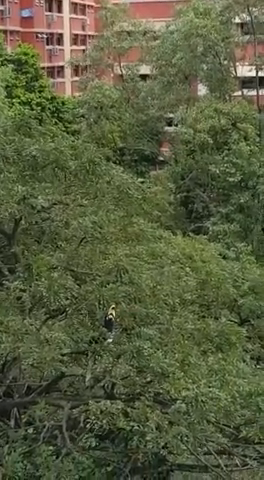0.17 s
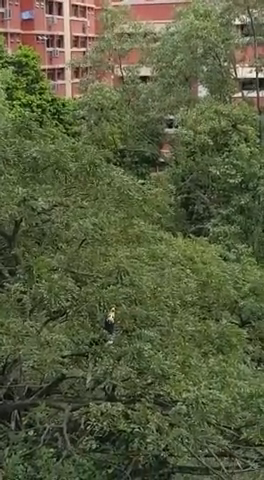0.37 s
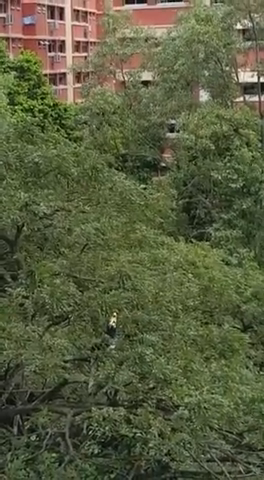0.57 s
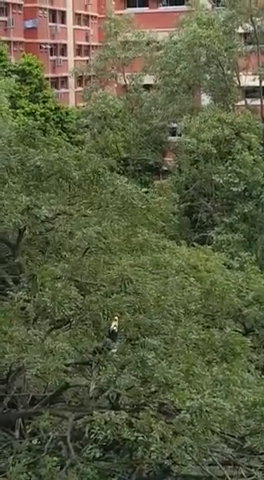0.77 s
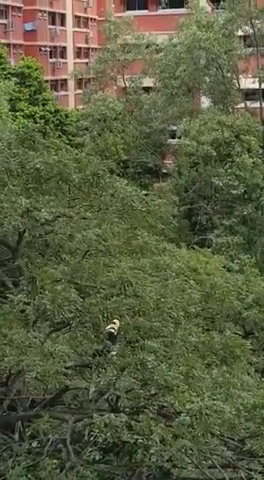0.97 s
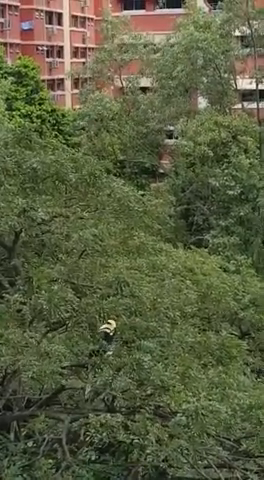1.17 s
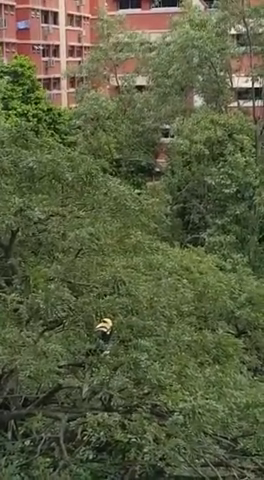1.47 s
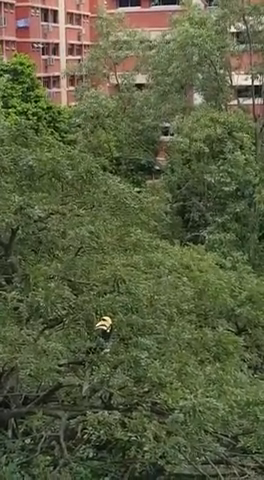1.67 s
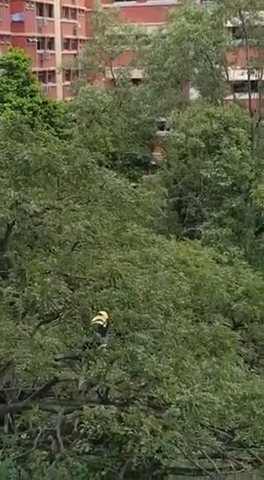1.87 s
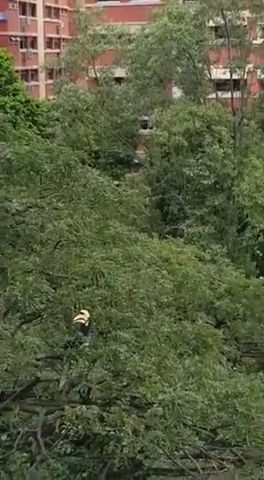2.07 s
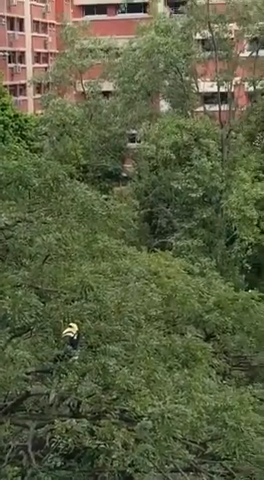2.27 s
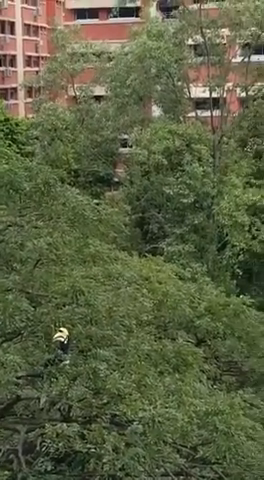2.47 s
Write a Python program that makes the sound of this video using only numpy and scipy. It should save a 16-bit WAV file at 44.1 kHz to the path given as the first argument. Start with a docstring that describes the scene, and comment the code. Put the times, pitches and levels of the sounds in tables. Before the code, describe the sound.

Three sharp raspy hornbill yelps ring off tall buildings after quiet traffic rumble and thin insects

```python
"""From the start, distant traffic roars and hums, two insects sing thinly, and an earlier echo dies away.
Tyres swell around 0.9 s; a soft hiss at 1.8 s and a faint whistle at 2.0 s follow, all shaped from noise
or wavering tones. From 2.1 s a hornbill in a treetop gives three short harsh yelps, each mixing rasping
noise with a tone that rises and then falls, with extra lines between its harmonics.
The yelps scatter in the leaves and ring on off tall house fronts."""
import sys
import numpy as np
from scipy import signal
from scipy.fft import rfft, irfft
from scipy.io import wavfile

SR = 44100
rng = np.random.default_rng(int(sys.argv[2]) if len(sys.argv) > 2 else 0)


def pcm_store(signal):
    """Save signal as 16-bit PCM."""
    levels = np.round(np.clip(np.atleast_2d(signal), -1, 1) * 32767)
    wavfile.write(sys.argv[1], SR, levels.astype(np.int16).T)


N = 115542  # length in samples, about 2.6 s


def undb(db):
    """Turn decibels into a gain."""
    return 10 ** (np.asarray(db) / 20)


def unit(x):
    """Scale to an average strength (rms) of 1."""
    return x / np.sqrt(np.mean(x ** 2))


def along(points):
    """Read a (frequency, value) table at every frequency bin, on a logarithmic frequency scale."""
    hz, value = np.array(points, float).T
    bins_hz = np.arange(N // 2 + 1) * SR / N
    return np.interp(np.log(bins_hz + 1), np.log(hz), value)


def colour(x, points):
    """Make each frequency stronger or weaker by a (frequency, level) table."""
    return irfft(rfft(x) * undb(along(points)), N)


def noise(channels=2):
    """White noise: every frequency equally strong on average."""
    return rng.standard_normal((channels, N))


def narrow(hz, width, channels=1):
    """Noise in one band, halved in amplitude half a width from its centre, rms 1."""
    bins_hz = np.arange(N // 2 + 1) * SR / N
    return unit(irfft(rfft(noise(channels)) / (1 + (2 * (bins_hz - hz) / width) ** 4), N))


def walk(rate):
    """A smooth random wander of spread 1, mostly slower than half the rate [Hz]."""
    return narrow(0, rate)[0]


def sine(hz):
    """A pure tone that follows a pitch curve, rms 1."""
    turns = np.cumsum(hz) / SR + rng.random()
    return np.sqrt(2) * np.sin(2 * np.pi * turns)


def gate(t, start, end, edge):
    """Open from start to end, with sloped edges centred on those times."""
    return np.clip(np.minimum(t - start, end - t) / edge + .5, 0, 1)


# Balance of the road roar: (frequency [Hz], relative level [dB])
ROAR_COLOUR = [(15, -48), (25, -37), (43, -15.5), (56, -2.5), (70, -10.5), (92, -1), (110, -4), (128, -9.5),
               (160, 0.5), (188, -9), (215, -4.5), (255, -11), (370, -13), (480, -16), (670, -13),
               (790, -15), (940, -12.5), (1200, -18), (1500, -21.5), (2000, -26), (2600, -30.5),
               (3000, -28), (3400, -37.5), (4600, -46), (7000, -51), (10500, -58.5), (12200, -49.5),
               (13500, -55), (15500, -53)]
# Strength of the left-right difference: (frequency [Hz], relative level [dB])
ROAR_WIDTH = [(60, -17), (150, -23.5), (290, -7.5), (640, -7), (1400, -1.5), (3000, -3), (7000, 0.5)]
# Lean of the roar to the left: (frequency [Hz], left minus right level [dB])
ROAR_LEAN = [(150, 0), (380, 4.5), (700, 2), (1300, 2), (2500, 1.5), (8000, 0.5)]


def road_roar():
    """Many far vehicles blend into noise, nearly the same in both ears in the deep bass; rms 1."""
    mid, side = colour(noise(), ROAR_COLOUR)
    side = colour(side, ROAR_WIDTH)
    half_lean = along(ROAR_LEAN) / 2
    left = irfft(rfft(mid + side) * undb(half_lean), N)
    right = irfft(rfft(mid - side) * undb(-half_lean), N)
    return unit(np.array([left, right]))


# Far engines: (start [s], end [s], pitch [Hz], pitch wander [Hz], level [dB])
HUMS = [(0.14, 0.598, 80, 2.8, -43), (0.15, 0.48, 99, 11.87, -39), (-.3, 2.9, 151, 3.015, -50),
        (1.124, 1.39, 150, 1.73, -45.5), (-.3, 2.9, 217, 5.02, -52), (1.57, 1.82, 108, 7.93, -45.5),
        (1.67, 2.41, 378, 9.1, -57), (0.55, 1.21, 670, 14.17, -54.5)]
HUM_FADE_S, HUM_WANDER_HZ = 0.17, 12.05


def engine_hums(t):
    """Each far engine is one low tone whose pitch wanders."""
    hums = 0
    for start, end, hz, wander, db in HUMS:
        tone = sine(hz + wander * walk(HUM_WANDER_HZ))
        hums = hums + tone * gate(t, start, end, HUM_FADE_S) * undb(db)
    return hums


INSECT_HZ, INSECT_WIDTH_HZ, INSECT_DB, INSECT_FLICKER_DB = 3050, 76, -62.5, 1.5


def steady_insect():
    """A thin song: a narrow band of noise with a flickering level."""
    song = narrow(INSECT_HZ, INSECT_WIDTH_HZ, channels=2)
    return song * undb(INSECT_DB + INSECT_FLICKER_DB * walk(30))


# Bouts of the second insect: (start [s], end [s], level before flicker [dB])
BUZZ_BOUTS = [(0, .28, -61.5), (.3, .43, -64), (.595, .645, -63)]
BUZZ_HZ, BUZZ_WIDTH_HZ, BUZZ_EDGE_S, BUZZ_FLICKER_DB = 4020, 130, 0.029, 1.2


def buzzing_insect(t):
    """A higher narrow band of noise, switched on in short bouts."""
    bouts = sum(gate(t, start, end, BUZZ_EDGE_S) * undb(db) for start, end, db in BUZZ_BOUTS)
    buzz = narrow(BUZZ_HZ, BUZZ_WIDTH_HZ, channels=2)
    return buzz * bouts * undb(BUZZ_FLICKER_DB * walk(40))


# Balance of the echo: (frequency [Hz], relative level [dB])
ECHO_COLOUR = [(800, -19), (2000, 5), (3000, -2), (4200, -5), (6000, -24), (9000, -30), (15000, -35)]
ECHO_DB, ECHO_T60_S = -50, 3.1  # level at the start, time to fall by 60 dB


def earlier_echo(t):
    """An echo of something earlier: coloured noise that fades steadily from the start."""
    return unit(colour(noise(), ECHO_COLOUR)) * undb(ECHO_DB - 60 * t / ECHO_T60_S)


# Time and level of the peak; the length is from the peak down to 1/e
PASSING_S, PASSING_LENGTH_S, PASSING_DB = 0.92, 0.31, -51.5
PASSING_HZ, PASSING_WIDTH_HZ = 840, 230


def passing_tyres(t):
    """Tyre noise swells and sinks once, partly shared by both ears and partly different in each."""
    shared = narrow(PASSING_HZ, PASSING_WIDTH_HZ)
    separate = narrow(PASSING_HZ, PASSING_WIDTH_HZ, channels=2)
    swell = np.exp(-((t - PASSING_S) / PASSING_LENGTH_S) ** 2)
    return unit(shared + separate) * swell * undb(PASSING_DB)


ROAR_DB, ROAR_SWELL_DB = -40, 0.65


def traffic(t):
    """Road roar with a slowly drifting level, low hums and one swell of tyres."""
    roar, hums, tyres = road_roar(), engine_hums(t), passing_tyres(t)
    return roar * undb(ROAR_DB + ROAR_SWELL_DB * walk(9.2)) + hums + tyres


# Balance of the hiss: (frequency [Hz], relative level [dB])
HISS_COLOUR = [(1500, -12), (3000, 6), (6000, 5), (10000, 3), (15000, -4)]
HISS_S, HISS_DECAY_S, HISS_DB = 1.822, .105, -61.5


def soft_hiss(t):
    """Coloured noise that starts at once and dies along half a bell curve."""
    fade = (t > HISS_S) * np.exp(-((t - HISS_S) / HISS_DECAY_S) ** 2)
    return unit(colour(noise(), HISS_COLOUR)) * fade * undb(HISS_DB)


WHISTLE_S, WHISTLE_LENGTH_S, WHISTLE_FADE_S = 2.025, .09, .08
WHISTLE_HZ, WHISTLE_WANDER_HZ, WHISTLE_DB = 2850, 15, -56.5


def faint_whistle(t):
    """One short pure tone with a slightly unsteady pitch."""
    tone = sine(WHISTLE_HZ + WHISTLE_WANDER_HZ * walk(110))
    return tone * gate(t, WHISTLE_S, WHISTLE_S + WHISTLE_LENGTH_S, WHISTLE_FADE_S) * undb(WHISTLE_DB)


# Resonances of the throat: (frequency [Hz], level [dB])
THROAT = [(500, -12.5), (1150, -13), (1420, -3), (1660, 1), (2100, 5), (2400, 1), (2600, 1), (2900, 5.5),
          (3250, -2.5), (3600, -2), (3950, -13), (4450, -6.5), (4900, -9.5), (5350, -15), (5750, -13.5),
          (7000, -14.5), (7700, -21.5), (8300, -12.5), (8700, -21.5), (9500, -26), (11300, -25.5),
          (12500, -44), (15500, -37)]
# Extra colour of the rasp: (frequency [Hz], level [dB])
RASP_TILT = [(1000, 3), (1800, 2.5), (2350, -1), (2750, 7.5), (3300, 1), (4500, -4), (6500, 4.5),
             (12000, -2)]
EDGE_S, CALL_DB = 0.0025, -0.5
JITTER, JITTER_HZ = .06, 1300  # share of the pitch at full roughness, rate
SHIMMER, SHIMMER_HZ = .1, 260  # share of the tone's strength, rate
RASP_GATE = 0.69  # how deeply the rasp pulses, 0-1


def yelp(t, curve, bill, count):
    """Jittering membranes beat strong-weak every count vibrations; throat and bill colour tone and rasp."""
    s, *columns = np.array(curve).T
    hz, db, rough, between = (np.interp(t, s, column) for column in columns)
    rough = np.clip(rough, 0, 1)
    jittered_hz = hz * (1 + JITTER * rough * walk(JITTER_HZ))
    phase = 2 * np.pi * np.cumsum(jittered_hz) / SR
    pattern = np.cos(phase / count)  # the slower beat adds lines between the harmonics
    harmonics = sum(np.cos(k * phase) for k in range(1, 14))
    tone = harmonics * (1 + between * pattern) * (1 + SHIMMER * walk(SHIMMER_HZ))
    rasp = colour(rng.standard_normal(N) * (1 + RASP_GATE * pattern), RASP_TILT)
    sounding = gate(t, s[0], s[-1], EDGE_S)

    def through_bill(source):
        """Throat and bill strengthen some frequencies; the result has rms 1 while it sounds."""
        coloured = colour(colour(source, THROAT), bill)
        return coloured / np.sqrt(np.average(coloured ** 2, weights=sounding))

    mix = np.sqrt(1 - rough ** 2) * through_bill(tone) + rough * through_bill(rasp)
    return mix * undb(db + CALL_DB) * sounding


# Course of each yelp: (time [s], pitch [Hz], level before CALL_DB [dB], roughness [0-1],
# depth of the lines between harmonics [0-1])
FIRST_CURVE = [(2.092, 945, -30, 0.85, .6), (2.095, 955, -32.5, 0.9, 0.7), (2.102, 1004, -29, 0.83, 0.8),
               (2.107, 1182, -27, 0.34, 0.56), (2.111, 1211, -25.5, 0.16, 0.45),
               (2.115, 1132, -27, 0.12, 0.4), (2.123, 1106, -21.5, 0.1, 0.16), (2.132, 1059, -27, 0.14, 0),
               (2.137, 1068, -25, 0.7, 1)]
SECOND_CURVE = [(2.279, 1104, -33, .85, 0.84), (2.288, 1186, -28, 1, 1), (2.296, 1186, -22.5, 0.14, 0.43),
                (2.305, 1231, -20, 0.22, 0.63), (2.309, 1198, -27, 0.7, 0.38),
                (2.315, 1172, -24, 0.13, 0.45), (2.328, 1080, -28.5, .25, 0.77),
                (2.341, 1053, -40, 0.75, 0.67)]
THIRD_CURVE = [(2.443, 920, -43, 1, 0.79), (2.455, 970, -27, 0.52, 0.9), (2.463, 1032, -27.5, 0.15, 0.92),
               (2.470, 1032, -24.5, 0.25, 0.65), (2.474, 1180, -25, 0.35, 0.53),
               (2.482, 1151, -29.5, 0.52, 1), (2.496, 1040, -34, 0.41, .6), (2.503, 1050, -41, 0.98, .6)]
# The bill is held differently for each yelp: (frequency [Hz], level [dB])
FIRST_BILL = [(1150, 1.5), (1650, 2), (2200, -1), (2850, 0.5), (3400, 0), (4400, 1), (4900, -1), (8000, 1)]
SECOND_BILL = [(1200, -0.5), (1650, 3), (1950, -2.5), (2400, 2), (2870, 1.5), (3150, 1), (3600, 0.5),
               (4700, 0.5), (8000, 1)]
THIRD_BILL = [(1200, -0.5), (1650, 0.5), (2050, 1), (2600, -2.5), (3000, 2), (3600, 1.5), (4500, 0.5),
              (8000, -1.5)]


def hornbill(t):
    """Three yelps; count is the number of vibrations in each strong-weak pattern."""
    first = yelp(t, FIRST_CURVE, FIRST_BILL, count=2)
    second = yelp(t, SECOND_CURVE, SECOND_BILL, count=2.5)
    third = yelp(t, THIRD_CURVE, THIRD_BILL, count=2)
    return first + second + third


SMEAR_S, SMEAR_STEP_HZ = .0011, 200  # spread of the time shifts, spacing between random shifts


def twig_smear(x):
    """Twigs in the path shift each frequency a little differently in time."""
    steps = rng.standard_normal(512)
    bins_hz = np.arange(N // 2 + 1) * SR / N
    shift_s = SMEAR_S * np.interp(bins_hz / SMEAR_STEP_HZ, np.arange(len(steps)), steps)
    turns = np.cumsum(shift_s) * SR / N  # summing delay over frequency gives phase
    return irfft(rfft(x) * np.exp(-2j * np.pi * turns), N)


# Phase between the two microphone ports: (frequency [Hz], lead of the left [radians])
PORT_PHASE = [(500, 1), (1700, -1.7), (2400, 1.06), (3600, -0.4), (4400, -1.45), (5300, -2), (7000, -1.5),
              (8400, -1.5), (15000, -2.5)]
PAN_DB = 0  # left minus right


def direct_sound(voice):
    """The straight path reaches the two ports with slightly different phases."""
    left_right = np.array([[1], [-1]])
    turn = np.exp(.5j * along(PORT_PHASE) * left_right)
    return irfft(rfft(voice) * turn, N) * undb(PAN_DB / 2 * left_right)


def scatter(voice, reply):
    """Repeat the voice as many tiny reflections, given by a fading noise."""
    return signal.fftconvolve(voice[None], unit(reply) / np.sqrt(N), axes=1)[:, :N]


LEAVES_DB, LEAVES_T60_S, LEAVES_RISE_S = -6.5, 0.071, 0.0028


def leaves(t, voice):
    """Leaves close by throw the sound back in a quick, dense scatter."""
    reply = noise() * undb(-60 * t / LEAVES_T60_S) * np.clip(t / LEAVES_RISE_S, 0, 1)
    return scatter(voice, reply) * undb(LEAVES_DB)


# Colour of the longer-lasting part of the tail: (frequency [Hz], level [dB])
FRONTS_COLOUR = [(1400, 4.5), (2300, -1), (3100, -6), (3650, -4), (4000, 3), (4450, -0.5), (4900, -6),
                 (5600, -4.5), (7000, -12)]
FRONTS_DB, FRONTS_T60_S, FRONTS_REST_T60_S, FRONTS_RISE_S = -11.5, 0.76, 0.43, 0.021
TAIL_BLUR_RAD, TAIL_BLUR_HZ, TAIL_FLICKER_DB = 1.17, 129, 2


def house_fronts(t, voice):
    """Tall house fronts return a long tail that wavers in phase and level."""
    source = noise()
    lasting = colour(source, FRONTS_COLOUR)
    rest = 0.31 * (source - lasting)  # fades sooner
    reply = lasting * undb(-60 * t / FRONTS_T60_S) + rest * undb(-60 * t / FRONTS_REST_T60_S)
    tail = scatter(voice, reply * np.clip(t / FRONTS_RISE_S, 0, 1))
    blur = np.exp(1j * TAIL_BLUR_RAD * narrow(0, TAIL_BLUR_HZ, channels=2))
    tail = np.real(signal.hilbert(tail) * blur)
    return tail * undb(FRONTS_DB + TAIL_FLICKER_DB * walk(32))


def scene():
    """The bird in its surroundings."""
    t = np.arange(N) / SR
    voice = twig_smear(hornbill(t))
    bird = direct_sound(voice) + leaves(t, voice) + house_fronts(t, voice)
    road = traffic(t)
    trees = steady_insect() + earlier_echo(t) + faint_whistle(t) + soft_hiss(t) + buzzing_insect(t)
    return bird + road + trees


TOP_HZ = 15740


def record(dry):
    """The recorder steeply cuts everything above its top frequency."""
    low_pass = signal.ellip(10, .2, 80, TOP_HZ, fs=SR, output="sos")  # order, ripple dB, cut dB
    return signal.sosfilt(low_pass, dry)


dry = scene()
out = record(dry)
pcm_store(out)
```